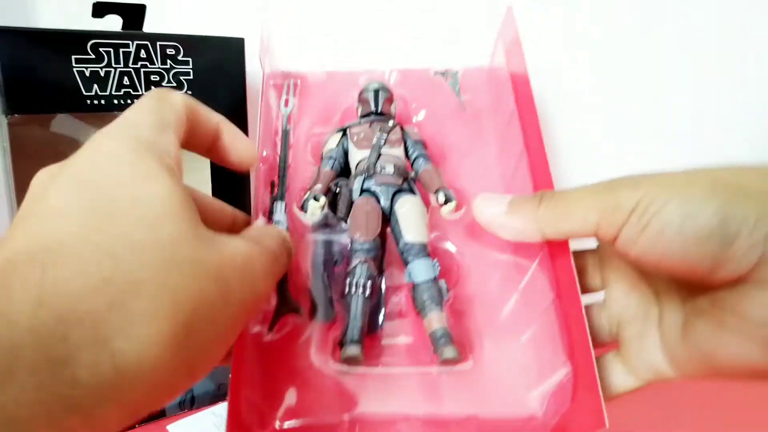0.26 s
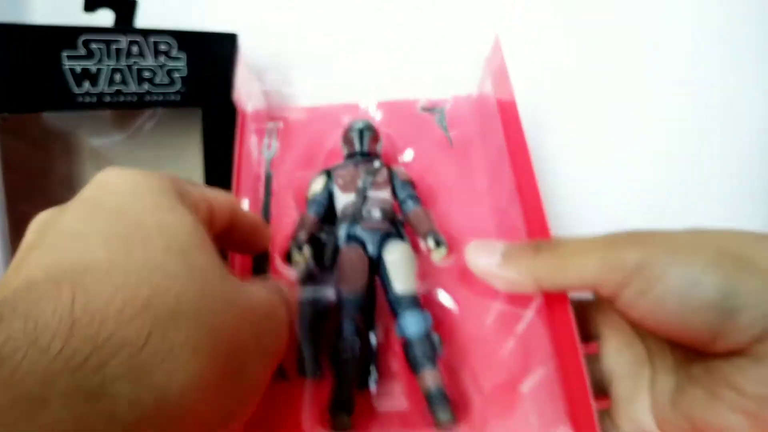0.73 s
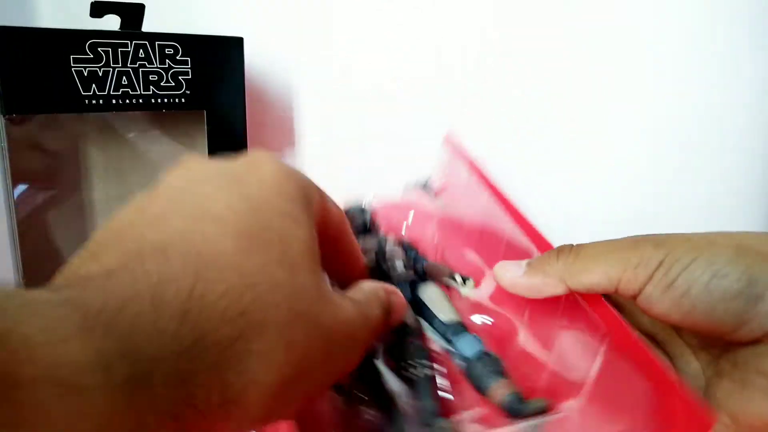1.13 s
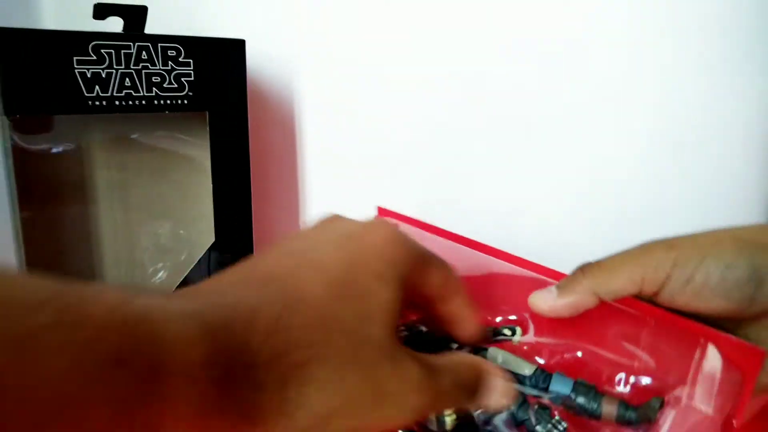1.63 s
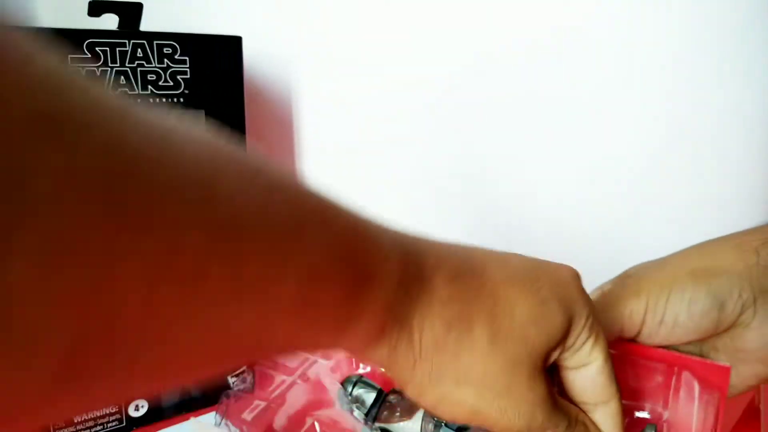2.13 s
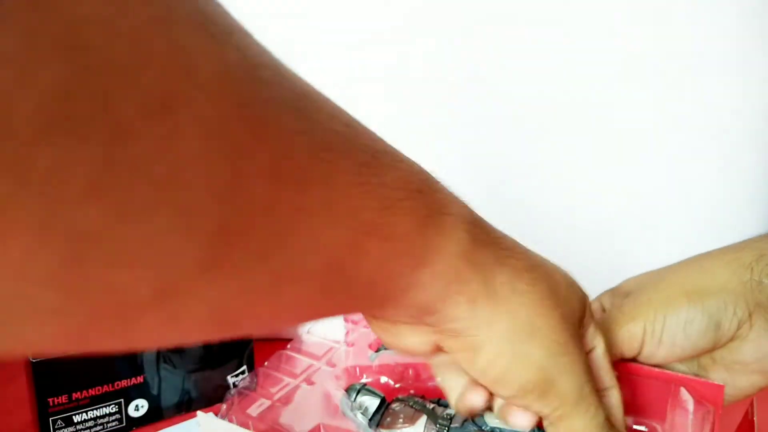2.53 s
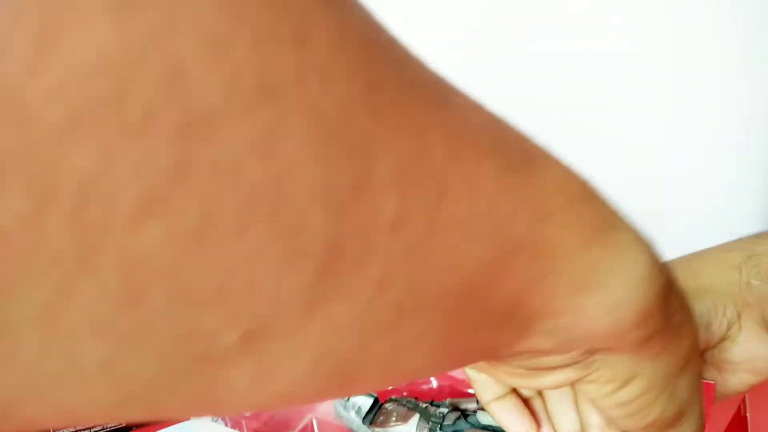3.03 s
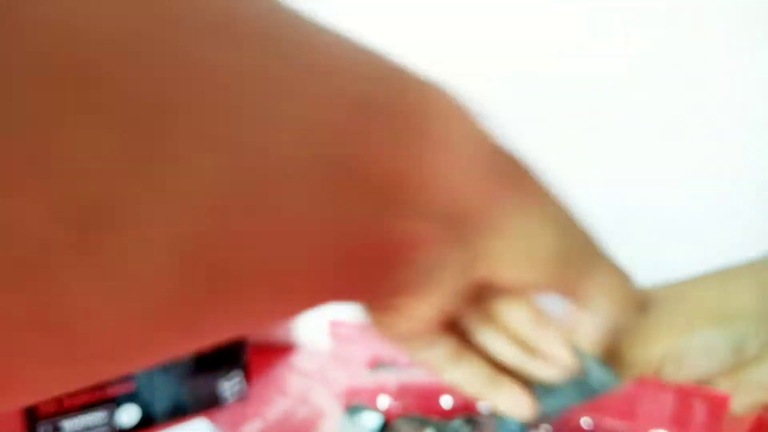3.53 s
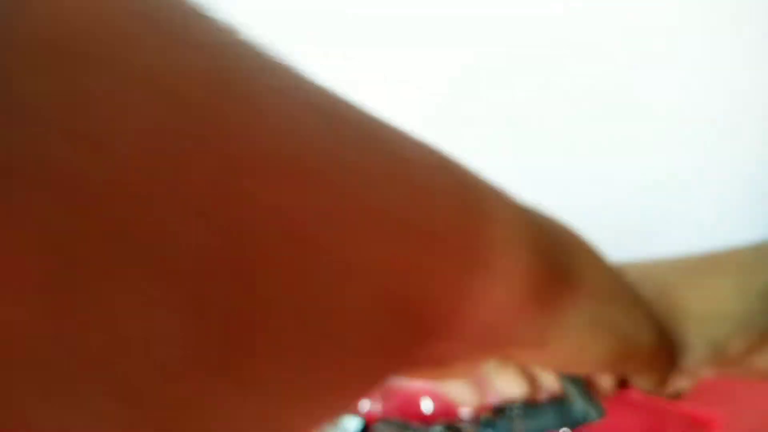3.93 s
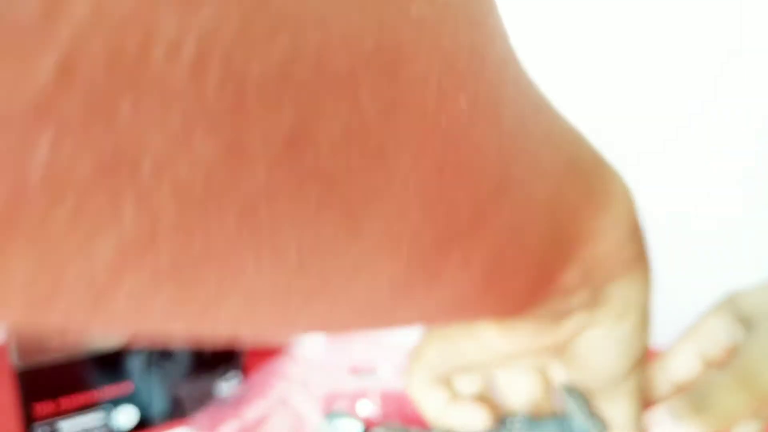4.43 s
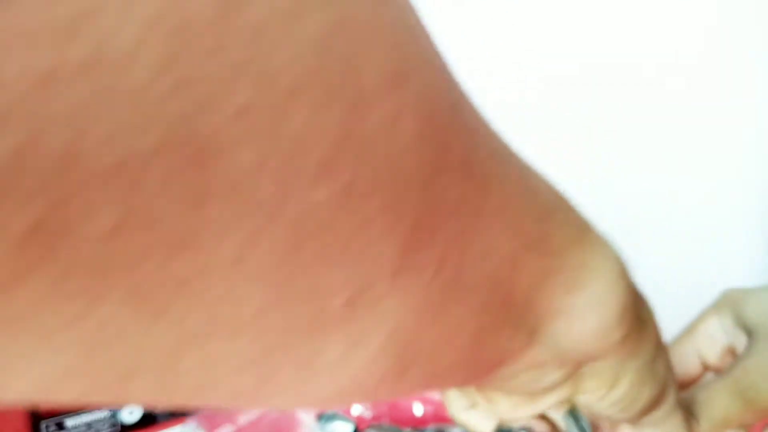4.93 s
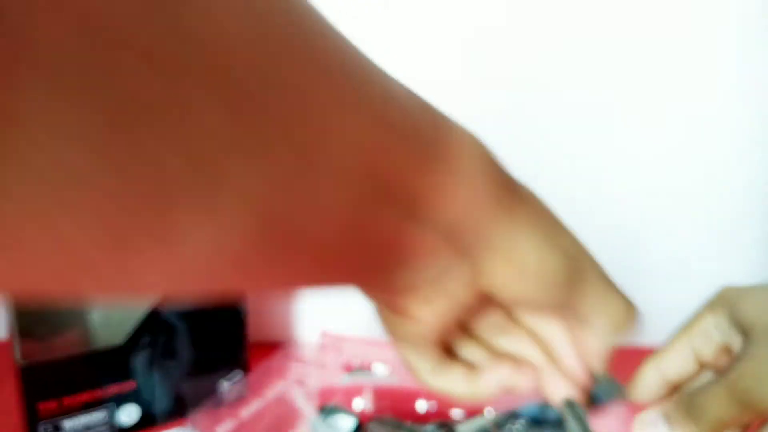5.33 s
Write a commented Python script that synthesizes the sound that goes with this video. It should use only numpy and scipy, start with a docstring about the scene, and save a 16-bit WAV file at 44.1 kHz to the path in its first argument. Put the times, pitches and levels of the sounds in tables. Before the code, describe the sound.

Close stereo phone pickup of thin plastic being flexed and rubbed indoors. Small crackles with quiet gaps grow into sharp, hollow-ringing snaps in the middle, ease off around four seconds, then build to one violent crack at about 5.2 seconds, followed by smaller clicks and rustling. Short room echo, low background rumble.

```python
"""In a small quiet room, hands work a toy out of a stiff plastic blister tray close to a phone.
Dents snap through as ragged noise bursts that pass a dent resonance and set the tray's modes ringing.
Fingers rub as fluttering coloured noise, and tiny creases tick as short filtered rasps.
The walls answer with fading noise; at listed times the rubbing and echoes lose their treble.
Below lies a low wavering rumble of noise; a faint whistle, a gliding sine, comes once from far off."""
import sys
import numpy as np
from scipy import signal
from scipy.fft import rfft, irfft
from scipy.io import wavfile
from scipy.ndimage import uniform_filter1d

SR = 44100
rng = np.random.default_rng(int(sys.argv[2]) if len(sys.argv) > 2 else 0)


def transcribe(u):
    """Save the signal u as a 16-bit wav file named by the first command-line argument.

    u: samples, shape (n,) or (channels, n), limited to [-1, 1]; the rate is SR.
    q: integer samples, one column per channel.
    """
    v = np.clip(np.atleast_2d(u).T, -1, 1)
    q = np.round(v * 32767).astype(np.int16)
    wavfile.write(sys.argv[1], SR, q)


N = 245637

# Tone colour of the snapping and rubbed sheet. Each row: frequency in Hz, relative level in dB per Hz.
CRACK_COLOUR = [(550, -37.5), (900, -1.5), (1400, -2), (2000, -2.5), (3500, -4.5), (5000, -12.5),
                (6500, -21.5), (8500, -35.5), (12000, -95)]
# Tone colour of the bright edge on top of it. Each row: frequency in Hz, relative level in dB per Hz.
EDGE_COLOUR = [(2470, -65.5), (4200, -7), (4650, -12), (5250, -9), (6980, -9.5), (8760, -4), (10800, -19.5),
               (14100, -26), (15400, -37.5), (16400, -32)]


def undb(db):
    """Turn decibels into an amplitude factor."""
    return 10 ** (np.asarray(db) / 20)


def unit(x):
    """Scale to rms 1."""
    return x / np.sqrt(np.mean(x ** 2))


def colour(x, points):
    """Filter the last axis to the curve of (Hz, dB) points, with no sound ahead of its cause."""
    hz, db = np.transpose(points)
    grid = np.maximum(np.arange(2049) * SR / 4096, 1)
    curve_db = np.interp(np.log(grid), np.log(hz), np.maximum(db, -90))
    # folding the cepstrum gives the minimum-phase filter
    cepstrum = irfft(np.log(undb(curve_db)))
    cepstrum[1:2048] *= 2
    cepstrum[2049:] = 0
    response = irfft(np.exp(rfft(cepstrum)))
    response = response.reshape((1,) * (x.ndim - 1) + (-1,))
    return signal.oaconvolve(x, response, axes=-1)[..., :x.shape[-1]]


def pair(shape, like, count):
    """Noise at the phone's two ports: a shared part, count samples later at the right, plus parts of their own."""
    shared = rng.standard_normal(shape)
    own = rng.standard_normal((2,) + shape)
    like = np.clip(like, 0, 1)
    shared = np.array([shared, np.roll(shared, count, axis=-1)])
    return np.sqrt(like) * shared + np.sqrt(1 - like) * own


def walk(rate):
    """Slow random wavering of rms 1: levels held for 1 / rate seconds, then smoothed twice."""
    k = int(SR / rate)
    steps = np.repeat(rng.standard_normal(N // k + 1), k)
    return unit(uniform_filter1d(uniform_filter1d(steps, k), k)[:N])


def dent_bursts(span):
    """A dent gives way in several small jerks: noise that starts fast and falls 20 dB in span seconds."""
    t = np.arange(8192) / SR
    shape = (1 - np.exp(-t / (0.12 * span))) * np.exp(-np.log(10) * t / span)
    jerks = undb(2.3 * np.repeat(rng.standard_normal((len(span), 256)), 32, axis=1))
    return pair((len(span), len(t)), 0.13, count=2) * shape * jerks


def wall_answers(span):
    """Each snap gets its own diffuse answer from the walls: fading noise made uneven by after-ticks."""
    room_t60_s, room_db = 0.35, -18
    t = np.arange(8192) / SR
    after_ticks = undb(2.57 * np.repeat(rng.standard_normal((len(span), 64)), 128, axis=1))
    noise = pair((len(span), len(t)), 0.021, count=0)
    walls = undb(room_db) * noise * np.sqrt(span / 0.0098) * after_ticks  # longer cracks feed it more
    fade = np.exp(-np.log(1000) * t / room_t60_s) * np.cos(np.pi / 2 * t / t[-1])
    return walls * (1 - np.exp(-t / 0.001)) * fade


def dent_resonance(dent_hz):
    """The size of the dent sets a broad resonance with a narrow ring on top."""
    spread_oct = 0.04  # random scatter in octaves
    hz = dent_hz * 2 ** (spread_oct * rng.standard_normal(dent_hz.shape))
    tune = np.arange(1, 4098) * SR / 8192 / hz
    off_tune = 1j * (tune - 1 / tune)
    return 0.82 + 0.83 / (1 + 5.1 * off_tune) + 1.8 / (1 + 80.0 * off_tune)


def tray_ring(ring_hz):
    """A snap strikes the tray's modes near its own pitch (ring) and flexes the five lowest (thump)."""
    # Modes of the tray. Each row: frequency in Hz before flexing, strength in dB before each snap's mix,
    # time to fade by 60 dB in s before the fingers' damping of the ring.
    tray = [(135, -15, 0.11), (186, -11, 0.12), (260, -7.5, 0.16), (355, -8, 0.2), (463, -4, 0.069),
            (555, -6, 0.069), (650, -6, 0.11), (712, -7, 0.11), (775, -11, 0.12), (860, -12, 0.05),
            (937, -9, 0.05), (1028, -13, 0.05), (1155, -7, 0.04), (1320, -8.5, 0.12), (1660, -9, 0.15),
            (1940, -11, 0.12)]
    flex_share = 0.029  # bending the tray detunes its modes from snap to snap
    damp_per_s = 47  # fingers on the tray shorten its ring
    knock_share, knock_ms = 0.5, 4.7  # part of the ring that dies quickly under the fingers
    hz, db, t60 = np.transpose(tray)[:, :, None]
    t = np.arange(4096) / SR
    flex = 1 + flex_share * rng.standard_normal((len(ring_hz), 1, 1))
    swing = np.exp((2j * np.pi * hz * flex - np.log(1000) / t60) * t)
    modes = undb(db) * swing * (1 - np.exp(-t / 0.0014))

    chance = rng.standard_normal((len(ring_hz), 3, len(tray)))
    octaves_away = np.abs(np.log2(hz.T / ring_hz))
    mix = undb(4.3 * chance[:, 0] - 14.2 * octaves_away) * np.exp(1.43 * 1j * chance[:, 1])
    # the ports see the large sheet from slightly different sides, more so for the higher modes
    skew = np.exp(1j * 0.28 * chance[:, 2] * hz.T / 1000)
    ring = np.imag(np.einsum("ckm,kmt->ckt", np.array([mix * skew, mix / skew]), modes))
    ring = ring * np.exp(-damp_per_s * t)
    ring = ring * (1 - knock_share + knock_share * np.exp(-1000 * t / knock_ms))

    low_mix = undb(5.3 * chance[:, 2, :5]) * np.exp(1j * chance[:, 1, :5])
    thump = np.imag(np.einsum("km,kmt->kt", low_mix, modes[:, :5]))
    return ring, thump


def snaps():
    """Dents snap through at listed times: returns the cracks, the walls' answers and the tray's ring."""
    # Dents snapping through; peaks are those of each part alone, before left/right balance.
    # Each row: time in s, crack peak in dB, tray ring peak in dB, bright edge peak in dB,
    # left minus right in dB, pitch the ring is strongest near in Hz,
    # crack length in ms (fall by 20 dB; kept within 0.5 to 40), dent resonance in Hz before scatter,
    # low flex peak in dB.
    dents = [(0.0223, -38.5, -58, -42, 0.0, 358.0, 12.5, 2370, -50),
             (0.0972, -40.5, -48, -50.0, 0, 460.0, 3.0, 2530, -52.5),
             (0.187, -41.5, -51, -40, -1, 338.0, 4.6, 5370, -57.5),
             (0.2129, -45, -49, -61, -10, 620, 5.1, 2330, -49),
             (0.305, -64, -67, -79, 0.0, 500.0, 7.1, 1380.0, -57.0),
             (0.4319, -41.5, -39.5, -45, 0.0, 550.0, 16.0, 2050, -52),
             (0.4823, -34.0, -53.0, -47.5, 10, 830.0, 5.3, 1970, -55),
             (0.4928, -34.5, -47, -39.5, -9.0, 861.0, 9.6, 2460, -57.0),
             (0.5252, -30, -31.5, -36, 1.5, 960, 8.5, 2280.0, -48),
             (0.5516, -32, -33.5, -39, -5, 920, 5.8, 1830.0, -47),
             (0.6783, -69, -54.5, -80.0, -3.0, 910, 8.0, 1300.0, -56),
             (0.705, -67, -72, -80.0, 0.0, 503, 7, 1300.0, -60),
             (0.77, -64, -61, -70, -3, 301.0, 9.6, 1300.0, -67),
             (0.845, -60, -53, -64, 1.0, 490, 6.7, 1430.0, -55.5),
             (0.906, -65, -70.0, -74, 0.0, 500.0, 8.0, 1300.0, -61.0),
             (0.9231, -71, -49.5, -73, -7, 905, 6.7, 1300.0, -62),
             (0.9517, -50.5, -46.0, -64, 0.0, 820, 9.5, 1820, -54.5),
             (0.968, -56, -66, -64, 3, 800.0, 9.4, 2210.0, -61),
             (0.9961, -52.5, -47, -74, 0.0, 374, 19, 2280.0, -57),
             (1.1084, -29.5, -24.5, -51.0, -1.5, 875, 12.6, 1310, -48),
             (1.1644, -37, -44, -48.0, -3, 474.0, 10.0, 1320, -47),
             (1.2344, -46.5, -43, -68, -6, 710, 9.2, 1330, -62),
             (1.28, -52.5, -41.5, -72.0, -2, 745.0, 31, 1300.0, -69),
             (1.4144, -57.5, -47.5, -62, -1, 370, 8.2, 1570.0, -60),
             (1.5744, -56.5, -47.5, -63.0, 2.0, 662.0, 14, 1390, -53),
             (1.6594, -63, -72.0, -71, 4, 370.0, 6.1, 1880, -69),
             (1.7484, -48, -37.5, -49.5, -2, 724, 4.7, 1280, -52),
             (1.8317, -32.5, -50.0, -53, -2, 1280.0, 5.2, 2530, -58.5),
             (1.8716, -29.0, -39.5, -39.5, -2, 900.0, 15.0, 2350, -53),
             (1.8936, -32.5, -42.0, -40.5, -2, 700.0, 10.0, 3200, -47),
             (1.9929, -29.5, -54, -39.5, -1.0, 423.0, 5.4, 3530, -52),
             (2.034, -36, -42, -46, -2, 705, 9.5, 1290, -45),
             (2.0497, -34, -40, -50.0, -3.0, 674.0, 9.9, 1300.0, -47),
             (2.0694, -34, -42, -70.0, -4.0, 860.0, 2.6, 1300.0, -61),
             (2.1065, -38, -42, -65, 0.0, 900.0, 8.8, 1300.0, -53),
             (2.1256, -30, -63.0, -43, 0, 365.0, 6.3, 3050, -54.5),
             (2.137, -30, -49, -41.5, -12, 960.0, 8.7, 3200, -51),
             (2.1999, -30, -28.5, -72.0, 1, 890, 3.2, 1720.0, -56.0),
             (2.2717, -40, -45, -52, 1.0, 665.0, 24, 2930.0, -68),
             (2.2932, -30, -47, -50.5, -2, 710.0, 8.2, 3170, -62),
             (2.3134, -61.0, -31.5, -70.0, -1.0, 660, 3.0, 1470.0, -59),
             (2.3366, -39.5, -56, -70.0, -13, 1060.0, 9.1, 2190, -57),
             (2.374, -48.0, -49, -65.0, 3, 800.0, 5.3, 1520.0, -72),
             (2.3897, -62, -55, -53, -3, 910.0, 6.6, 3120.0, -68),
             (2.509, -33.5, -37, -47, -8, 900.0, 7.5, 2120, -51.0),
             (2.5202, -22.5, -34, -29, 2, 1030.0, 5.6, 1385, -42),
             (2.5406, -14, -28, -24.5, -1.0, 660.0, 10.2, 1600, -48),
             (2.599, -16, -28.5, -37, 0.0, 940, 5.2, 1720, -39.5),
             (2.6933, -29.5, -36.0, -40.0, -3, 690.0, 4.7, 3530, -49),
             (2.7134, -26.5, -29, -38, 0, 780.0, 1.6, 1310, -37),
             (2.7696, -41.5, -42, -39.5, -1, 740.0, 7.8, 2430.0, -55),
             (2.8435, -53, -67, -47, 0.0, 700.0, 7.1, 5640.0, -65),
             (2.8739, -46, -51, -43.5, 0, 660.0, 5.6, 2840.0, -50),
             (2.9243, -33, -46, -38, -4, 480.0, 11, 2070, -53),
             (2.937, -27.5, -37, -39.5, 0, 480.0, 9.5, 1360, -45.0),
             (2.9875, -16.0, -16.5, -27, 0, 663, 12, 1660, -37),
             (2.9995, -23, -45, -25.5, -10, 660.0, 6.9, 4470, -47),
             (3.064, -27, -40, -48, 3, 700.0, 6.0, 1400, -49),
             (3.0765, -9.5, -9, -20.5, -1, 760, 10.6, 1640, -30.5),
             (3.0844, -15, -16, -19, 12, 970, 9.4, 2350.0, -32),
             (3.0964, -9, -8.5, -25.5, -1.5, 725, 12, 1436, -35),
             (3.24, -25.5, -17, -28, 1, 844, 7.4, 2840.0, -56),
             (3.258, -44, -27, -52, -2, 800.0, 5.6, 1370, -51),
             (3.2694, -36, -49, -39, 5, 660.0, 5, 2500.0, -51),
             (3.2834, -24.5, -49, -37, 0, 781.0, 8.2, 2580, -60),
             (3.2994, -41, -22, -33.5, 3.0, 875.0, 40, 1300.0, -39),
             (3.3218, -22.5, -16.5, -27.5, 0.5, 646, 11, 2620, -30),
             (3.3274, -21.5, -20, -33, -4, 596, 8.8, 1740, -31),
             (3.3528, -7.5, -15.5, -25.5, 8, 740, 4, 3910, -33),
             (3.3967, -13, -14.5, -27, -4.5, 670, 7.3, 1760, -26),
             (3.462, -33, -24.5, -68.0, 2.0, 870.0, 2.9, 1560, -40),
             (3.4845, -26.5, -42.0, -58, -4, 904.0, 4.9, 2770, -45.0),
             (3.5204, -14.5, -27, -43, -5, 690, 4.8, 1855, -40),
             (3.5483, -14.0, -36, -33.0, 1.5, 930, 13, 3620, -37),
             (3.5606, -15, -37, -46, -4, 426.0, 4.3, 1440, -50),
             (3.5694, -22, -21.5, -54.0, -4, 700.0, 3.8, 3400, -37),
             (3.5972, -21.5, -19, -36.0, -3, 673, 5.7, 1850, -33.5),
             (3.6494, -32.5, -31, -45, 3, 634.0, 11.0, 2140.0, -44),
             (3.8342, -28.5, -35.5, -31, -1, 690, 9.7, 2870, -64),
             (3.8516, -25, -24.0, -31, -1, 605, 26, 1990, -42),
             (3.8794, -28.5, -24.5, -40, 0, 780, 14, 1840, -39),
             (4.074, -60, -66.5, -69, 1, 720, 3.2, 1290, -57),
             (4.1675, -33, -41, -54, -8, 700.0, 12, 1760, -67),
             (4.209, -27, -30.5, -57, 4, 716, 5.4, 1800, -51.5),
             (4.2178, -17.5, -27.5, -41, -9.0, 810, 5.6, 2950, -63),
             (4.367, -43.5, -35, -80, -1, 860, 7.7, 1320, -58),
             (4.4024, -31, -40.5, -47, -2, 660.0, 3.5, 2840.0, -48),
             (4.4285, -42, -54, -53, -2, 700.0, 5.7, 1320, -55),
             (4.4732, -42.0, -45.5, -44.5, -1, 657.0, 8.1, 1780.0, -54),
             (4.484, -40, -39, -42, -2, 700.0, 7.1, 1330, -47.0),
             (4.5022, -32.5, -39.0, -59.0, -2, 726.0, 5.8, 2210.0, -41),
             (4.5555, -25.5, -40, -38.5, -2.5, 570.0, 1.36, 3670, -41),
             (4.6768, -32, -57, -29.5, -1.0, 640.0, 8.3, 2900, -44),
             (4.7454, -34.5, -42.5, -45, -1, 660, 23, 1590, -45),
             (4.795, -34, -30, -68, -2.0, 670, 4.9, 1310, -47),
             (4.8249, -37, -37, -70.0, 3, 516.0, 3.2, 1310, -45.5),
             (4.8449, -32, -32.5, -63.0, -2, 675.0, 4.6, 4130.0, -50),
             (4.8793, -29, -34, -40, -3, 705, 6.2, 1320, -38),
             (4.9472, -19.5, -27.5, -45, -0.5, 726, 10.2, 1710, -42.5),
             (5.0374, -14.5, -12.5, -13, -3.5, 670, 11.5, 1680, -19),
             (5.0554, -24, -21.5, -49, -2.5, 354, 33, 1380.0, -40),
             (5.1402, -21.5, -22.0, -57.0, -2, 1300, 13, 1300.0, -33),
             (5.1594, -21.0, -21, -49.0, 2.0, 680, 7.5, 1300.0, -31.5),
             (5.1734, -19, -29, -45, -4, 630.0, 3.4, 1310, -33.5),
             (5.1901, -23.5, -17, -57, -5, 725, 22, 1730, -34),
             (5.212, -8.5, -19, -24, -1, 516, 40, 4740, -27),
             (5.219, -0.5, -16, -2.5, 0.5, 1210.0, 11, 2050, -16),
             (5.2405, 5, -1.5, -15, -5.0, 895, 5.7, 1296, -19.5),
             (5.2594, -11, -22, -16.5, 5, 700.0, 6.8, 1340, -20.5),
             (5.2844, -35.0, -23, -54.0, 1.0, 900.0, 8.7, 1300.0, -30.5),
             (5.3314, -44.0, -20, -63.0, -5, 940, 5.0, 1300.0, -48),
             (5.3712, -28, -49, -43, -7, 665.0, 7.4, 3620, -39.5),
             (5.3894, -51, -63, -34, 4, 550, 7.9, 4180, -64),
             (5.4525, -26, -34, -33, -3.5, 654.0, 13, 1390, -41),
             (5.4879, -21.5, -35, -26.5, 2.5, 590.0, 9.9, 3540, -59),
             (5.5473, -26, -18.5, -39, 1, 645, 8.1, 2100, -41)]
    columns = np.transpose(dents)[:, :, None]
    start, crack_db, ring_db, edge_db, pan_db, ring_hz, ms, dent_hz, thump_db = columns
    span = np.clip(ms, .5, 40) / 1000
    burst, walls = dent_bursts(span), wall_answers(span)
    dent = dent_resonance(dent_hz)
    crack = [irfft(rfft(colour(x, CRACK_COLOUR)) * dent) for x in (burst, walls)]
    edge = [colour(x, EDGE_COLOUR) for x in (burst, walls)]
    ring, thump = tray_ring(ring_hz)

    length, ring_length = burst.shape[-1], ring.shape[-1]
    cracks, answers, rings = np.zeros((3, 2, N + length))
    for k, at in enumerate(start[:, 0]):
        i = max(int((at - .0006) * SR), 0)
        side = undb(np.array([pan_db[k], -pan_db[k]]) / 2)
        for (near, far), peak_db in ((crack, crack_db), (edge, edge_db)):
            gain = undb(peak_db[k]) / np.abs(near[:, k]).max()
            cracks[:, i:i + length] += gain * side * near[:, k]
            answers[:, i:i + length] += gain * far[:, k]
        ring_gain = undb(ring_db[k]) / np.abs(ring[:, k]).max()
        thump_gain = undb(thump_db[k]) / np.abs(thump[k]).max()
        rings[:, i:i + ring_length] += ring_gain * side * ring[:, k]
        rings[:, i:i + ring_length] += thump_gain * thump[k]
    return cracks[:, :N], answers[:, :N], rings[:, :N]


def hands():
    """Skin rubs the sheet as a fluttering hiss with a dull rustle; small creases tick through it."""
    # Fingers working the tray, levels before flutter and joined by straight lines.
    # Each row: time in s, rubbing level in dB, dull rustle level in dB.
    strokes = [(0, -69, -62), (.12, -54.5, -59), (.26, -63.5, -67), (.41, -55.5, -56.5), (.63, -65, -65),
               (1.03, -77.5, -66.5), (1.15, -55.5, -53), (1.32, -84, -61.5), (1.79, -56, -58.5),
               (1.93, -63, -60), (2.14, -57, -53.5), (2.23, -62, -59), (2.4, -65, -58), (2.57, -46, -43),
               (2.75, -68.5, -62.5), (3.08, -47, -40), (3.18, -59, -50), (3.27, -46, -49),
               (3.48, -55.5, -54), (3.6, -44, -40), (3.75, -51, -46), (3.98, -69.5, -75),
               (4.19, -45.5, -51.5), (4.38, -68.5, -51), (4.6, -59, -55), (4.64, -63, -51.5),
               (4.69, -53.5, -54.5), (4.82, -56.5, -46.5), (4.99, -61, -51.5), (5.07, -59, -44),
               (5.25, -41.5, -43.5), (5.46, -52.5, -49), (5.57, -44, -34)]
    # Tone colour of the dull rustle. Each row: frequency in Hz, relative level in dB per Hz.
    dull_colour = [(120, -11), (200, -0.5), (474, -5.5), (581, -1), (651, 3.5), (1090, -10.5), (1400, -17),
                   (1820, -10.5), (3080, -120)]
    bright_db, crease_db = -11, -4  # bright rubbing and creases, both against the rubbing
    start, *columns = np.transpose(strokes)
    rub_db, dull_db = (np.interp(np.arange(N) / SR, start, c) for c in columns)
    # about 200 ticks a second, each fading within a few ms, roughen the rubbing
    ticks = (rng.random(N) < 200 / SR) * undb(3.8 * np.minimum(rng.exponential(size=N), 3))
    ticks = signal.lfilter([1], [1, -np.exp(-1 / (0.00083 * SR))], ticks)
    sheet = pair((N,), 0.028, count=2) * (1 + 0.25 * ticks)
    dull = pair((N,), 0.77, count=2)
    rubbing = undb(rub_db + 3.84 * walk(30)) * unit(colour(sheet, CRACK_COLOUR))
    bright = undb(rub_db + bright_db + 3.0 * walk(59)) * unit(colour(sheet, EDGE_COLOUR))
    rustle = undb(dull_db + 1.63 * walk(30)) * unit(colour(dull, dull_colour))
    return rubbing + bright + rustle + undb(rub_db + crease_db) * creases()


def creases():
    """Small creases give way at random, each a short rasp with its own pitch."""
    pitches_hz = (300, 450, 700, 1200, 1900, 2800, 3800, 5200)
    per_s, fade_ms = 40, 4.6  # average rate at each pitch; time constant of the fade
    out = 0
    for hz in pitches_hz:
        ticks = (rng.random(N) < per_s / SR) * undb(6 * np.minimum(rng.exponential(size=N), 3))
        fading = signal.lfilter([1], [1, -np.exp(-1000 / (fade_ms * SR))], ticks)
        rasp = fading * pair((N,), 500. / hz, count=2)  # low pitches are more alike at the ports
        out = out + unit(signal.lfilter(*signal.iirpeak(hz, 3.5, fs=SR), rasp))
    return unit(out)


def room(ring):
    """The walls turn the tray's ring into a diffuse tail, much alike at both ports."""
    t60_s, level_db = 0.2, -5
    t = np.arange(SR // 2) / SR
    tail = pair(t.shape, 0.66, count=0) * np.exp(-np.log(1000) * t / t60_s) * np.minimum(t / 0.0075, 1)
    tail = tail / np.sqrt(np.sum(tail ** 2) / 2)
    mono = ring.mean(axis=0)[None]
    return undb(level_db) * signal.oaconvolve(mono, tail, axes=-1)[:, :N]


def treble_dips(x):
    """At listed times all but the bass (below about 600 Hz) drops, with edges of about 23 ms."""
    # Stretches of lowered treble. Each row: start in s, end in s, change of level in dB.
    dips = [(0.259, 0.417, -24), (0.627, 0.924, -15.5), (1.026, 1.105, -20), (1.327, 1.411, -15),
            (1.442, 1.597, -18), (1.607, 1.731, -23), (2.414, 2.497, -22), (2.819, 2.851, -10.5),
            (3.992, 4.11, -24.5), (4.652, 4.681, -20)]
    t = np.arange(N) / SR
    db = sum(depth_db * ((t > a) & (t < b)) for a, b, depth_db in dips)
    bass = signal.sosfiltfilt(signal.butter(3, 600, fs=SR, output="sos"), x)
    return bass + (x - bass) * undb(uniform_filter1d(1. * db, size=1000))


def hush():
    """Rumble of the house: wavering coloured noise, mostly alike at both ports, over a slow pressure drift."""
    # Tone colour of the rumble. Each row: frequency in Hz, relative level in dB per Hz.
    hush_colour = [(10, -17.5), (22, 8.5), (34, -3), (50, 6), (70, 0.5), (90, -13), (120, -8.5),
                   (190, -14.5), (300, -26), (650, -26.5), (850, -24), (1100, -53), (2500, -58.5),
                   (9000, -55.5), (16000, -79.5)]
    rumble_db, drift_db = -51, -49  # rms levels, the rumble's before wavering
    noise = unit(colour(pair((N,), 0.72, count=0), hush_colour))
    return undb(rumble_db + 0.38 * walk(14)) * noise + undb(drift_db) * walk(18)


def whistle():
    """A faint thin tone that flickers; its pitch rises quickly and falls slowly."""
    start_s, length_s, level_db = .81, .105, -89  # level before flicker
    low_hz, rise_hz = 5800, 370
    progress = np.clip((np.arange(N) / SR - start_s) / length_s, 0, 1)
    arch = np.sin(np.pi * progress ** .65)
    flicker_db = 6 * walk(90)
    tone = np.sin(2 * np.pi * np.cumsum(low_hz + rise_hz * arch) / SR)
    return undb(level_db + flicker_db) * np.sqrt(np.abs(arch)) * tone


def scene():
    """Add the layers; the treble dips touch only the echoes and the hands."""
    cracks, walls, ring = snaps()
    dipped = treble_dips(walls + room(ring) + hands())
    return cracks + ring + dipped + hush() + whistle()


def record(dry):
    """The phone rounds the loudest peaks and cuts everything above its top frequency."""
    top_hz = 16300
    rounded = np.tanh(1.05 * dry) / 1.05
    return signal.sosfilt(signal.ellip(12, .2, 100, top_hz, fs=SR, output="sos"), rounded)


dry = scene()
out = record(dry)
transcribe(out)
```